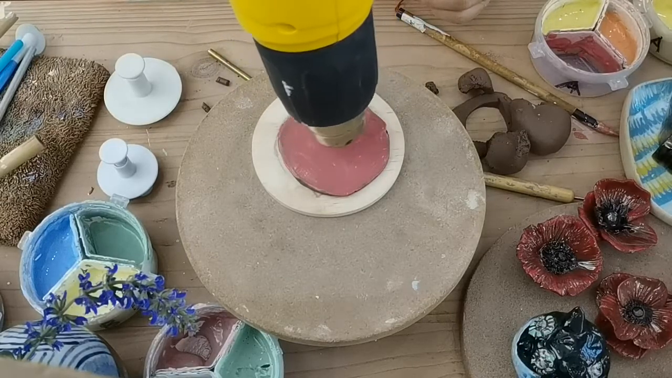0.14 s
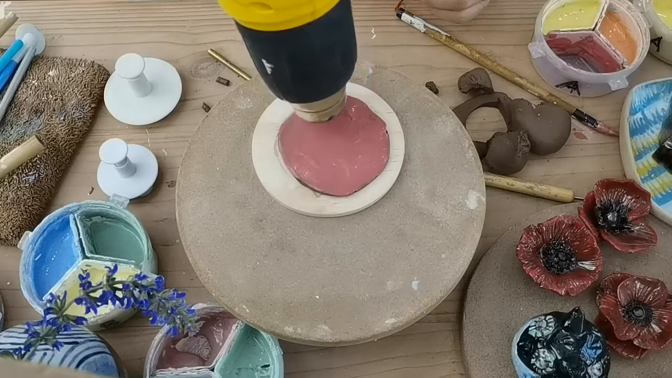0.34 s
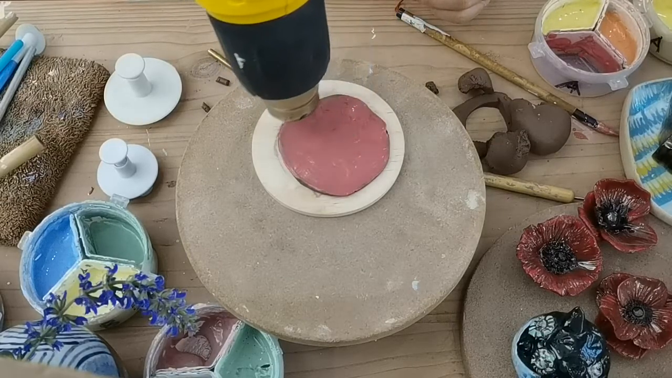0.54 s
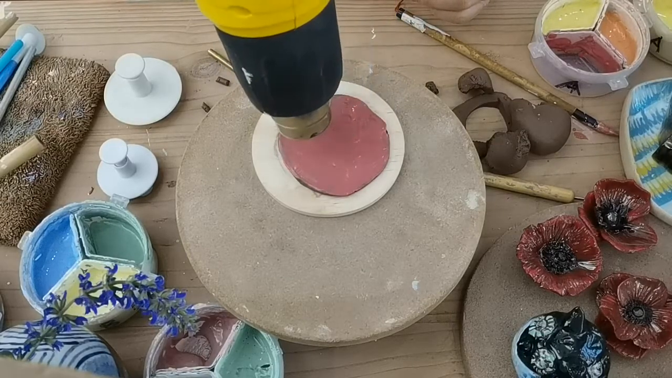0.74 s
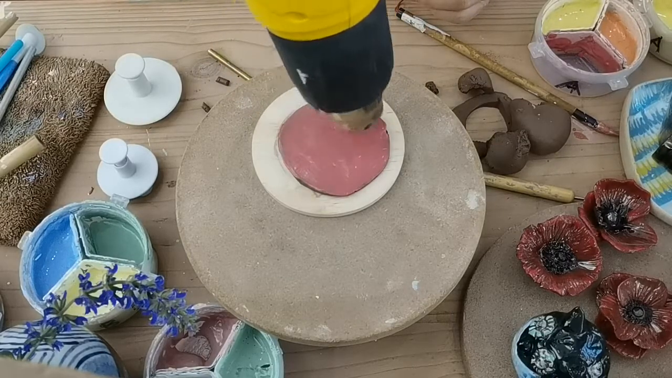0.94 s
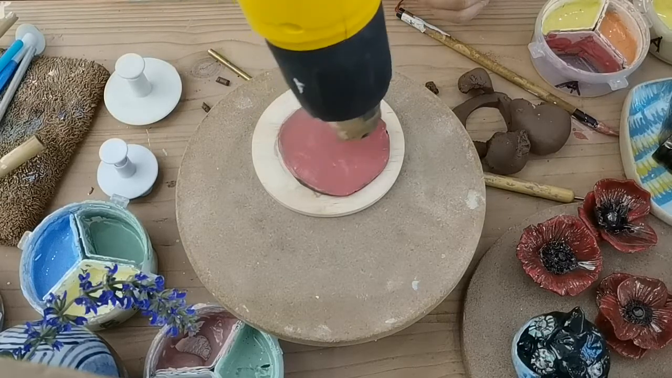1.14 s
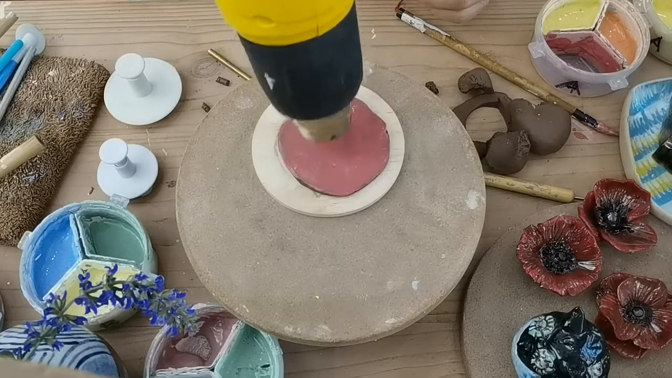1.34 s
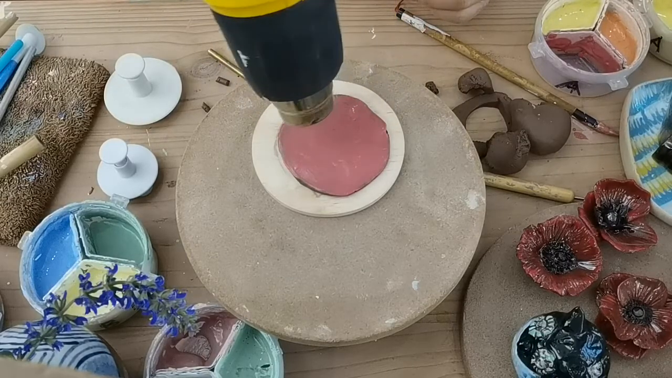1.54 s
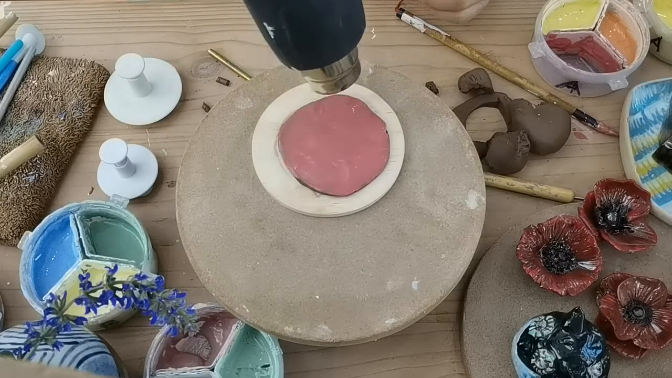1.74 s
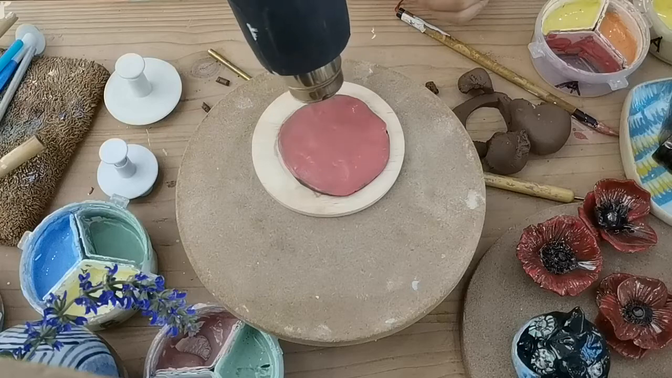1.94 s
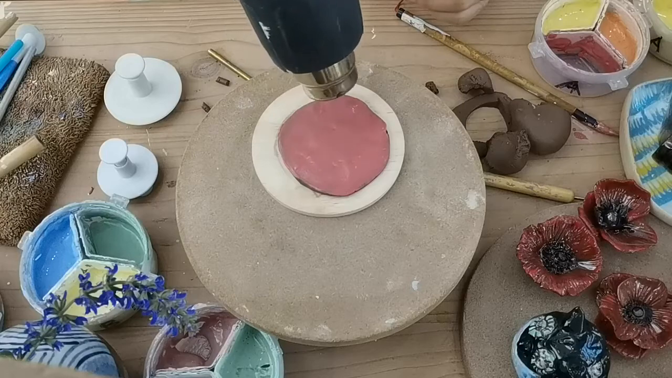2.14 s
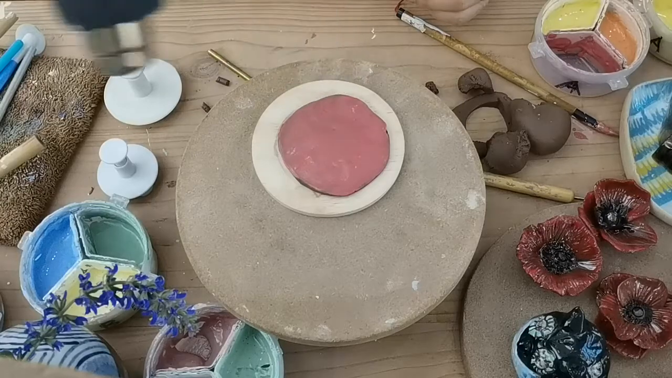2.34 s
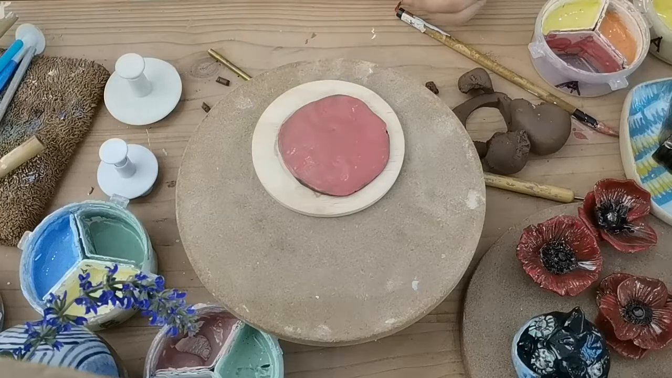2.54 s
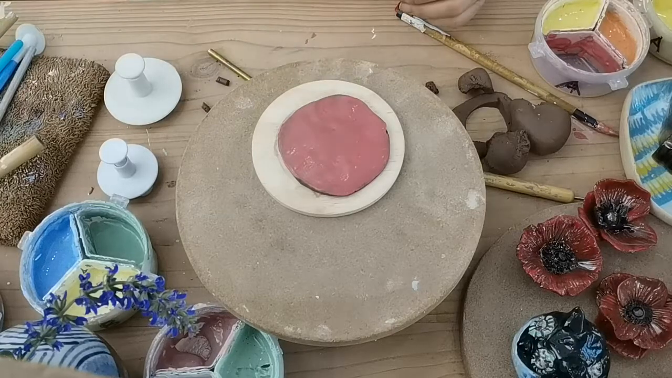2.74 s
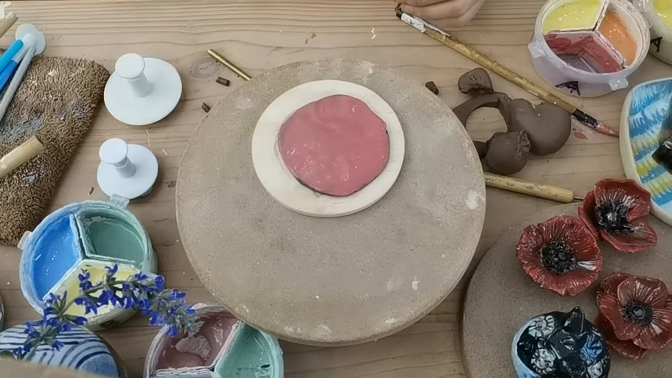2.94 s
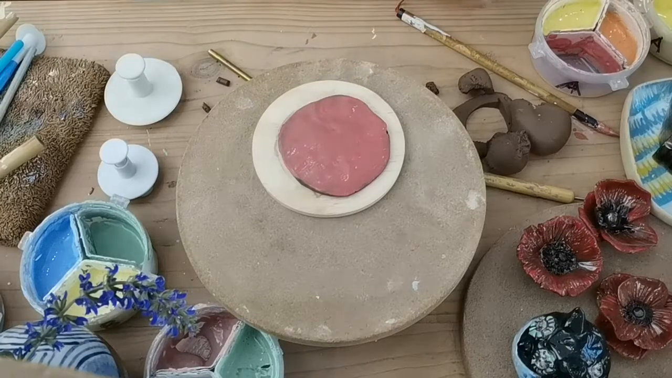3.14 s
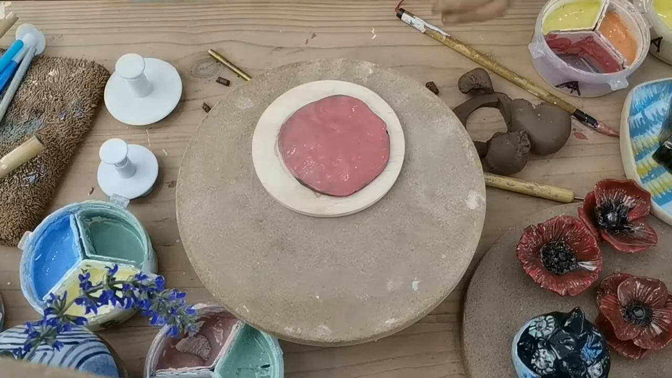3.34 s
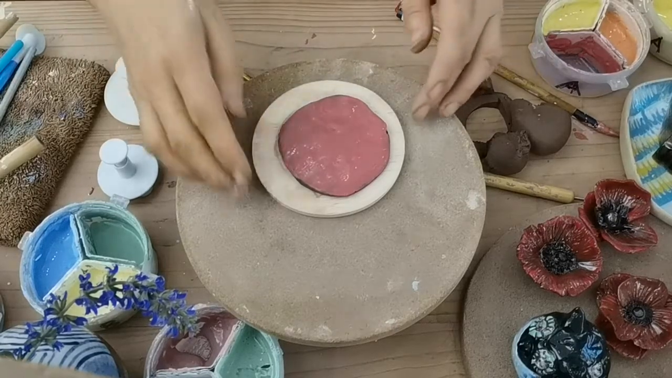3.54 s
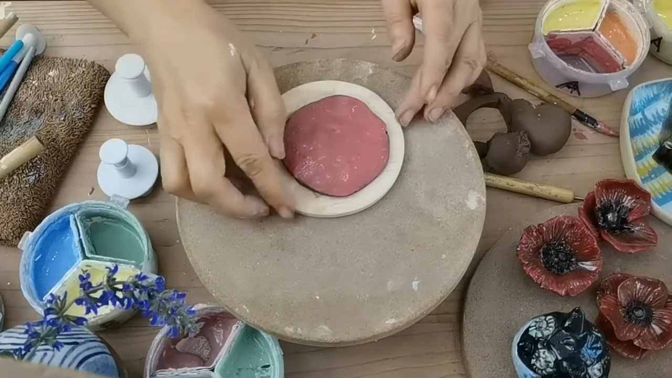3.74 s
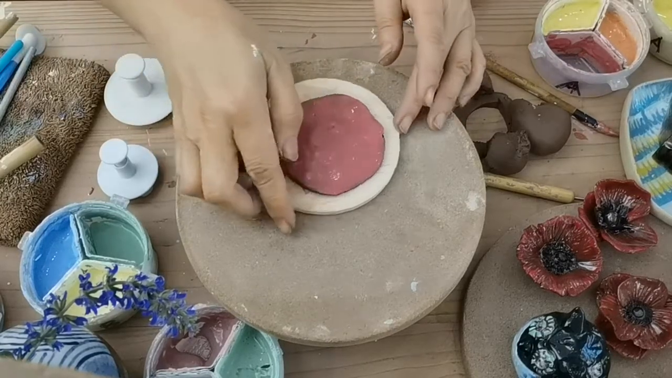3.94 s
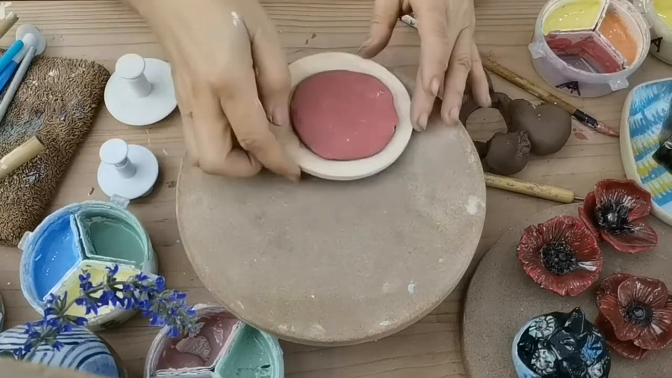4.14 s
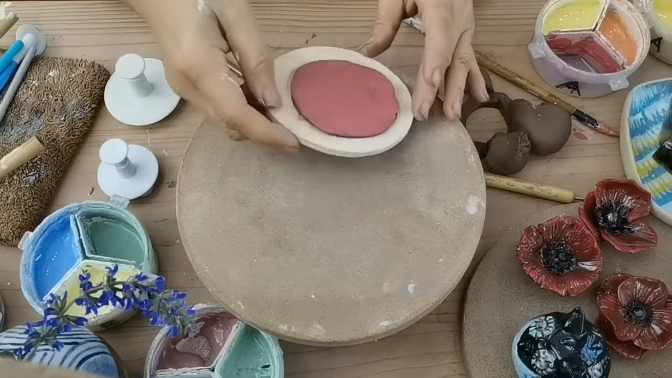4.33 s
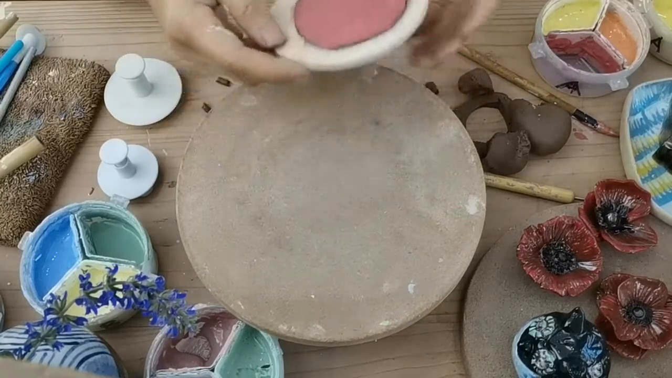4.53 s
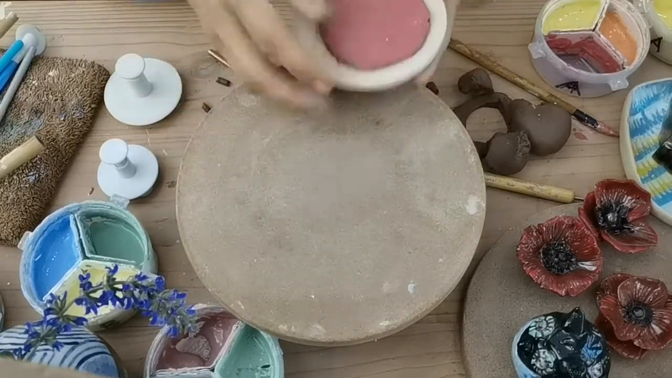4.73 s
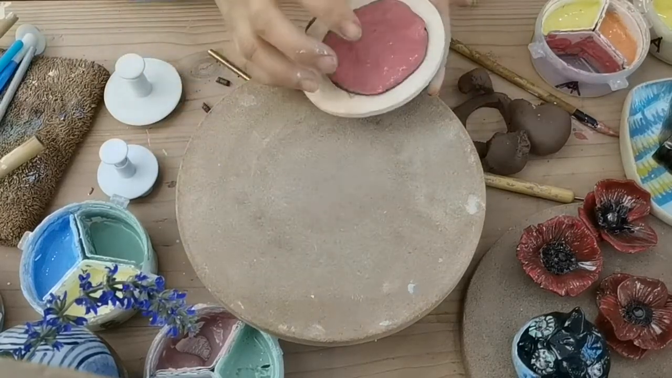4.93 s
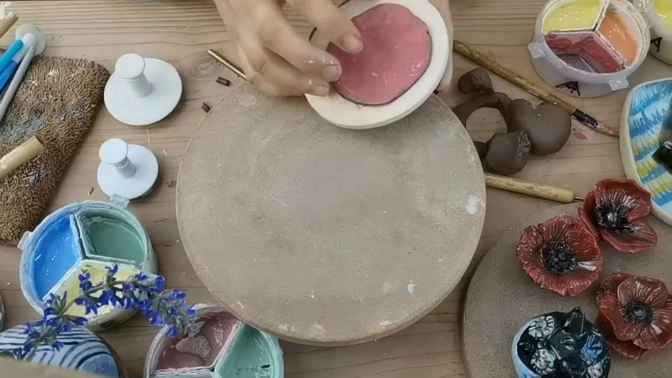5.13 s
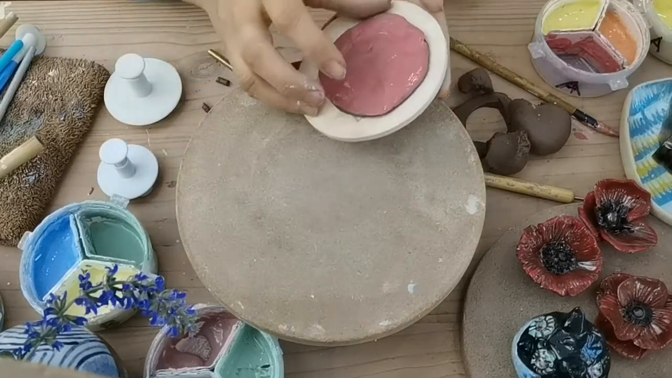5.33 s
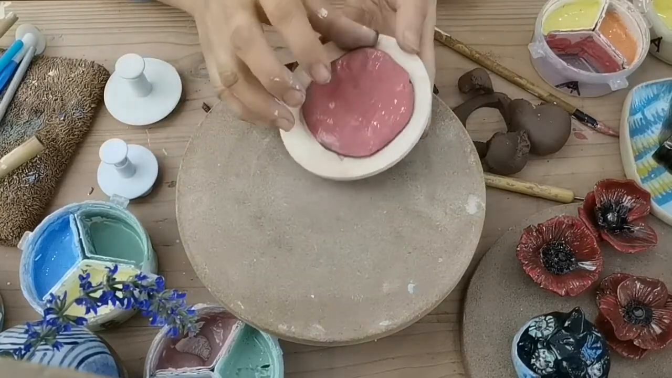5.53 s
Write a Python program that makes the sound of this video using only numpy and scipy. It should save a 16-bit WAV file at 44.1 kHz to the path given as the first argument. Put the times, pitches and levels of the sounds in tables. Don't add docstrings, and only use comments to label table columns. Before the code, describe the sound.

From 0 to 2.1 s a heat gun blows close by: a dense, steady roar of air, wide bright fan rush, brushy motor hiss and thin high whine, wavering slightly as the hand moves. At 2.09 and 2.15 s a sharp plastic double click switches it off; the whine vanishes and the rush darkens and sinks in a short falling moan, nearly gone by 3 s. At 3.03 s the tool lands on the wooden table with a knock, a heavier thud at 3.06 and small rattling taps until 3.2. Then a quiet room with low hum. From 3.65 to 4.3 s hands softly rub and drag a clay disc, with faint ticks; a clearer tick comes at 4.38, small finger squeaks around 4.8, and faint rubs at 5.2. A very faint glassy high ring flickers between 4.2 and 5.2. Very low stand rumble runs throughout; short room echo, close stereo microphone.

```python
import sys
import numpy as np
from scipy import signal
from scipy.fft import rfft, irfft, next_fast_len
from scipy.io import wavfile
from scipy.ndimage import uniform_filter1d

SR = 44100
rng = np.random.default_rng(int(sys.argv[2]) if len(sys.argv) > 2 else 0)


def gain_from_db(level_db):
    decades = np.asarray(level_db, float) / 20
    return 10 ** decades


def inscribe(sig):
    pcm = np.round(np.clip(np.atleast_2d(sig).T, -1, 1) * 32767)
    wavfile.write(sys.argv[1], SR, pcm.astype(np.int16))


N = 246078

# pitch_hz, level_db (per Hz)
AIR_RUNNING = [(41, -48.5), (70, -14), (213, -11.5), (268, -5), (329, -19), (410, -16), (655, -8),
               (747, -13), (827, -5.5), (943, -10.5), (1140, 1), (1510, -5.5), (1820, 3), (2080, -9.5),
               (2300, -10), (2990, -41), (5060, -120)]
AIR_SLOWING = [(41, -36.5), (70, 0.5), (105, -2), (129, -8.5), (198, -9.5), (435, -13), (664, -5),
               (780, -10), (943, -11), (2300, -21.5), (2990, -50), (5060, -120)]
# pitch_hz, level_db (per Hz)
RUSH_RUNNING = [(1350, -33), (2300, -4), (2710, 2), (3150, -9), (3370, -0.5), (3740, -8.5), (4050, -1),
                (4890, -6), (5210, -8), (6000, -9), (7800, -39), (13200, -120)]
RUSH_SLOWING = [(1350, -32), (2300, -5), (3000, -5), (3480, -4.5), (3870, -7), (4130, -1), (4600, -18),
                (6000, -22), (7800, -46.5), (13200, -120)]
# pitch_hz, level_db (per Hz)
HISS_RUNNING = [(3530, -41.5), (6000, -9), (7050, -8), (7550, -3.5), (8180, -7.5), (8640, -1), (9360, -11),
                (9690, -5.5), (10100, 1), (11800, -5.5), (12200, -7), (13900, -13), (14800, -20.5),
                (15300, -34)]
HISS_SLOWING = [(3530, -50), (6000, -23), (6450, -22), (6900, -3), (7490, -2), (8110, -8), (9970, -3),
                (11800, -14), (13100, -6), (15500, -19.5)]
# running_db, share_of_nearness, loss_when_stopped_db, fading_time_s
GUN_LAYERS = [
    (-31, 0.39, 35.5, 0.39),
    (-38.5, 2.2, 69.5, 1),
    (-37, 1.2, 35.5, 0.435),
]
# pitch_hz, level_db
WHINE = [(3628, -56), (3908, -55), (4188, -54), (4748, -57), (6702, -58), (7817, -50), (8096, -60),
         (8376, -67.5), (8936, -52), (9771, -50.5), (10051, -48), (10331, -56.5), (11445, -53),
         (11725, -54.5), (12010, -60.5), (12285, -61), (12565, -65), (13119, -66.5), (13399, -58),
         (13679, -59.5), (13959, -60), (14239, -64.5), (14513, -65.5), (14793, -62.5), (15068, -64.5),
         (15359, -73.5), (15635, -70), (10610, -59.5), (10889, -61.5), (11168, -59.5), (12843, -62.5)]
# top_s, rise_s, fall_s, level_db, pitch_hz
MOAN = [(2.32, 0.27, .22, -37, 1170), (2.38, .2, .1, -42.5, 1050), (2.25, 0.16, .15, -40.5, 1730),
        (2.56, .4, 0.45, -51.5, 935), (2.5, 0.11, 0.475, -55.5, 650), (2.66, 0.15, 0.18, -54, 375),
        (2.8, 0.74, .9, -75, 4200), (2.5, .4, 0.906, -64, 9850), (2.45, .3, .4, -57, 2700),
        (2.6, .4, 0.34, -65, 3500), (2.62, .4, .5, -69, 12700), (2.6, .4, .5, -70, 13500)]
# time_s, nearness_db, left_right_db
HAND = [
    (0.0, 0, -0.5),
    (0.67, 1, 0.2),
    (1.18, -.5, -0.3),
    (1.58, 1, 0.34),
    (1.68, -0.5, -0.5),
    (1.78, .5, -0.1),
    (2.1, 0, -0.51),
    (2.35, 0, -0.4),
    (2.75, 1.5, 3),
]
SHAFT_HZ = 279.2
OFF_S, COAST_S = 2.168, 0.39
LAID_S, MUFFLED_DB = 3.02, 11
SINK_HZ_PER_S = -150

# pitch_hz, likeness (1 = the same)
SAME = [(60, 0.9), (130, 1), (290, 0.78), (640, 0.83), (1410, 0.92), (3100, 0.127), (5500, -0.061),
        (9000, .24), (12000, -0.17), (15000, -.05)]
# pitch_hz, left_right_db
TILT = [(60, 0), (130, -1), (290, 0.0), (640, -1), (1410, -1.5), (3100, -2), (6820, 1.6), (15000, 2)]

# pitch_hz, level_db (per Hz)
ROOM = [(26, -22), (45, -5.5), (54, -5), (70, -21), (99, -10.5), (132, -16), (319, -26), (388, -22),
        (560, -29.5), (809, -28), (1530, -35), (2260, -44.5), (4170, -51.5), (8290, -55), (10100, -52.5),
        (13000, -54), (15700, -51)]
ROOM_DB = -53
# pitch_hz, likeness
ROOM_SAME = [(60, 0.827), (180, 0.93), (550, 0.23), (1650, -0.39), (4970, -0.19), (15000, -0.48)]
# pitch_hz, time_to_fall_60_db_s
TAIL = [(100, 0.32), (1000, 0.32), (4000, 0.31), (12000, 0.29)]
# top_s, rise_s, fall_s, level_db, pitch_hz
SWAY = [(.19, 0.18, .11, -39.5, 32.7), (.39, 0.086, 0.2, -45, 33), (.83, 0.27, 0.146, -34, 32),
        (1.15, 0.76, 1.05, -45.5, 29.9), (1.79, 2.28, 0.87, -34, 30.1), (2.3, 0.24, 0.24, -44.5, 30),
        (2.749, 0.18, 0.11, -56, 33), (3.16, 0.21, .11, -43, 32.5), (3.46, 0.45, 2.2, -50, 28.5),
        (4.35, 0.294, 0.36, -36.5, 30.1), (4.59, 0.212, 0.11, -39, 32.3), (5.14, 0.142, 0.25, -43.5, 33.2),
        (5.55, .22, 0.36, -48.5, 32.3), (.98, .9, 0.59, -55, 36), (1.7, .9, 0.93, -52.5, 37.1),
        (2.42, 1.26, 1.2, -36.5, 39.5), (3.81, 0.504, 0.23, -47.5, 39.4), (4.63, 0.41, 0.166, -57, 36.4),
        (5.24, .8, 0.37, -58.5, 37.2)]

# start_s, peak_db, ring_hz, knock_relative_db
SNAPS = [(2.085, -21, 11500, -2), (2.0854, -15, 7500, -8), (2.0865, -9, 7830, -10), (2.087, -19, 5200, -4),
         (2.0876, -12, 8200, -3), (2.0882, -19, 3600, -2), (2.0925, -21, 10500, -10),
         (2.096, -22, 11500, -10), (2.149, -17, 8000, -12), (2.15, -18, 10800, -11.5),
         (2.1514, -7, 5800, -6.5), (2.152, -11, 4400, -5), (2.1545, -19, 5600, -8),
         (2.1525, -14.5, 10300, -8), (2.159, -20, 10440, -14), (2.1605, -23, 13000, -14)]
# pitch_hz, level_db, time_to_fall_60_db_s
SWITCH = [(590, -5, 0.043), (1080, -7.5, 0.015), (1900, -2.5, 0.012), (3207.6, -9.5, 0.011),
          (4400, -3.5, .015), (10800, -7, 0.0031), (11820, -7, 0.0071)]

# start_s, table_bass_db, board_db, housing_db
LANDING = [
    (3.0298, -33, -19.5, -19),
    (3.039, -49.5, -33, -26),
    (3.055, -18.5, -17.5, -31),
    (3.058, -42, -29, -31),
    (3.068, -40.5, -28, -46),
    (3.091, -52.5, -44, -39.5),
    (3.111, -48, -48.5, -39),
    (3.117, -29, -32.5, -50),
    (3.127, -48.5, -46.5, -41),
    (3.183, -45.5, -38, -50.5),
]
# pitch_hz, level_db, time_to_fall_60_db_s
TABLE = [(98.7, -10.5, 0.3), (111, -1, 0.275), (133, -12, 0.094), (153.5, -12, 0.085), (205.8, -16.5, 0.25),
         (235, -7, 0.085)]
BOARD = [(289.8, -4.5, 0.075), (315, -16, 0.13), (381, -0.5, 0.087), (421, -7.5, 0.21), (470, -15, 0.081),
         (497, -17, 0.2), (573.4, -16, 0.13), (672, -23, 0.066), (887, -15, 0.037)]
HOUSING = [(1175, -8, 0.0585), (1232, -0.5, 0.057), (1100, -18, 0.05), (1434, -2.5, 0.037),
           (1688, -8, 0.05), (1900, -8, 0.033), (2345, -11, 0.037), (2600, -12, 0.036)]
# start_s, level_db, pitch_hz
CRACKS = [(3.0294, -26, 2700), (3.0297, -32, 5000), (3.0298, -45, 9500), (3.0299, -55, 14000),
          (3.032, -36, 4500), (3.039, -47, 2500), (3.0552, -17, 4200), (3.0553, -27.5, 8200),
          (3.0555, -40, 12300), (3.0565, -34.5, 10300), (3.0607, -28, 7200), (3.0612, -40, 10500),
          (3.0635, -30, 4000), (3.176, -46, 6830), (3.177, -58.5, 9100), (3.178, -46, 3600)]
HIT_LAG = 9

# top_s, rise_s, fall_s, level_db, hold_s
RUBS = [
    (3.948, .12, .15, -70.5, 0.046),
    (4.175, .06, 0.098, -57.5, 0.0069),
    (3.694, .044, .09, -63, 0),
    (4.06, .07, .06, -57, 0.091),
    (4.27, .1, 0.048, -62, 0),
    (4.386, .001, 0.0547, -53.5, 0.0054),
    (4.79, .035, 0.087, -54.5, 0.00012),
    (5.101, .045, .1, -74.5, 0.062),
    (5.219, .058, 0.099, -67, 0.003),
    (5.311, 0.046, .12, -78, 0.126),
]
# pitch_hz, level_db (per Hz)
RUB_COLOURS = [
    [(2500, -25), (4300, -2.5), (5500, -15), (7000, -4.5), (8500, -5.5), (10200, 1), (14000, -8.5)],
    [(1500, -13), (2200, -2), (3500, 0.5), (5000, -4), (6000, -9.5), (7600, -3), (10500, -5.5),
     (14000, -16.5)],
    [(2350, -49.5), (4000, -15), (5360, -27.5), (6160, 1), (7470, -19.5), (11600, -8), (15000, -9.5)],
    [(1470, -31.5), (2500, -3), (3400, -14), (4100, 1), (5300, -5), (6300, -11.5), (7500, -7),
     (8230, -13.5), (9860, -4.5), (12000, -21), (15000, -22)],
    [(2350, -44.5), (4000, -11.5), (5100, -13.5), (8720, -2), (11600, -14), (15000, -11)],
    [(1470, -31), (2500, -6.5), (2800, -8), (3270, -2.5), (5530, -9), (9860, 1.5), (15000, -13.5)],
    [(1470, -30), (2500, -7.5), (3370, -26), (4100, -4), (4490, -16.5), (4950, -7.5), (10800, -0.5),
     (15000, -9.5)],
    [(2940, -40), (5000, -16), (6880, -10), (7890, 0.5), (13000, -18.5)],
    [(1760, -39.5), (3000, -10), (4180, -1.5), (6380, -25), (7670, -6.5), (13000, -17.5)],
    [(2940, -40.5), (5000, -13.5), (8270, -8), (10100, 0), (13000, -23)],
]
# top_s, rise_s (negative, so it
# only falls), fall_s, level_db, hold_s
WISP = (2, -0.2, 1.13, -70.5, 0.3)
# top_s, rise_s, fall_s, level_db, pitch_hz
SCUFF = [
    (3.664, 0.028, 0.075, -53.5, 269),
    (4.04, .15, 0.3, -53.5, 268),
    (4.19, .12, 0.046, -61, 244),
]
# top_s, rise_s, fall_s, level_db, pitch_hz
DRAG = [
    (3.988, 0.15, 0.026, -69, 1304),
    (4.05, 0.063, 0.27, -60.5, 1390),
    (4.178, .09, 0.122, -60, 1455),
]
# top_s, rise_s, fall_s, level_db, pitch_hz
SQUEAKS = [
    (4.783, 0.0247, 0.033, -59, 2048),
    (4.808, 0.0313, 0.02, -57.5, 1900),
    (4.828, 0.011, 0.028, -66, 2097),
    (5.215, 0.07, 0.11, -66.5, 1963),
    (5.542, .045, 0.0337, -71, 2038),
]
# top_s, rise_s, fall_s, level_db,
# pitch_hz
WHISTLES = [(4.64, .25, .2, -83, 2750), (4.63, .15, .3, -83, 2320), (4.85, .12, .12, -81, 2320),
            (3.4, .5, 1.2, -85, 4250), (3.4, .4, .9, -87, 7000), (5.4, .06, 0.053, -82, 2300),
            (4.27, .04, 0.054, -76.5, 10900)]
# start_s, peak_db, pitch_hz, left_right_db
TICKS = [
    (4.0298, -64.5, 3000, -0.7),
    (4.042, -55.5, 1400, -1.04),
    (4.186, -57, 1500, 0.3),
    (4.1798, -52, 3440, 2.5),
    (4.35, -65, 1210, -2.0),
    (4.3803, -32, 2060, 4.5),
]
# pitch_ratio, level_db, time_to_fall_60_db_s
DISC = [(.9, -17.5, .007), (1, 11.5, 0.011), (1.12, -5, .007), (1.7, 0.5, 0.0041), (2.2, -13.5, 0.0035),
        (3.1, -2.5, 0.0075), (4.6, -12, 0.0047)]
# top_s, rise_s, fall_s, level_db, hold_s
RING = [
    (4.258, .08, 0.088, -75, 0),
    (4.601, 0.06, 0.27, -74.5, 0.06),
    (4.757, 0.11, 0.1, -78.5, 0.19),
    (5.045, .04, .05, -86, 0.015),
    (5.13, .05, .1, -87, .05),
]
# top_s, rise_s, fall_s, level_db, hold_s
UNDERTONE = [(4.68, .03, .04, -87, .015), (4.735, .03, .04, -85, .025), (4.81, .03, .05, -86, .03),
             (4.88, .03, .04, -88, .015), (5.02, .03, .03, -91, .01)]
RING_HZ = 8706
DEPTH_DB = 29.5

# pitch_hz, level_db
MIC = [(13500, 0), (14800, 0), (15700, -4), (16100, -30.5)]


def evened(x):
    return x / np.sqrt(np.mean(x ** 2) + 1e-20)


def read(points, hz):
    f, value = np.transpose(points)
    return np.interp(np.log(hz + 1), np.log(f + 1), value)


def coloured(x, points):
    n = next_fast_len(x.shape[-1])
    gain = gain_from_db(read(points, np.fft.rfftfreq(n, 1 / SR)))
    return irfft(rfft(x, n) * gain, n)[..., :x.shape[-1]]


def add(mix, s, sound):
    part = mix[..., round(s * SR):][..., :sound.shape[-1]]
    part += sound[..., :part.shape[-1]]


def panned(x, db):
    return np.array([x * gain_from_db(db / 2), x * gain_from_db(-db / 2)])


def resonate(x, hz, width_hz):
    turn = np.exp(2j * np.pi * np.cumsum(hz * np.ones(len(x))) / SR)
    r = np.exp(-np.pi * width_hz / SR)
    smooth = signal.lfilter([1 - r], [1, -r], x / turn + 1e-18)
    return 2 * (turn * smooth).real


def resonate_twice(x, hz, width_hz, hz2, width2_hz):
    return resonate(resonate(x, hz, width_hz), hz2, width2_hz)


def modes(table, factor=1):
    t = np.arange(SR // 4) / SR
    return sum(gain_from_db(db - 60 * t / t60) * np.sin(2 * np.pi * hz * factor * t) for hz, db, t60 in table)


def puff(t60, size):
    return rng.standard_normal(size) * gain_from_db(-60 * np.arange(size) / SR / t60)


def noise(start, end, blend, same, patchy_db):
    frames, hz = len(blend) // 256 + 5, np.fft.rfftfreq(1024, 1 / SR)
    a, b, c, d, patches = rng.standard_normal((frames, 513, 5)).T
    patches = uniform_filter1d(patches, size=6, axis=0)
    patches = evened(uniform_filter1d(patches, size=14, axis=1))
    share = blend[np.minimum(np.arange(frames) * 256, len(blend) - 1)]
    shape = gain_from_db(read(start, hz)[:, None] * (1 - share) + read(end, hz)[:, None] * share)
    shape /= np.sqrt((shape ** 2).mean(0))
    like = np.clip(read(same, hz), -1, 1)[:, None]
    left = a + 1j * b
    right = like * left + np.sqrt(1 - like ** 2) * (c + 1j * d)
    z = np.array([left, right])
    z *= shape * gain_from_db(patchy_db * patches) * panned(np.ones((513, 1)), read(TILT, hz)[:, None])
    return evened(signal.istft(z, nperseg=1024, noverlap=768)[1][:, :len(blend)])


def swell(top, rise, fall, db, hold=0):
    t = np.arange(max(top - rise, 0), top + hold + fall, 1 / SR)
    below = np.maximum(np.maximum((top - t) / rise, (t - top - hold) / fall), 0)
    return t, gain_from_db(db - DEPTH_DB * below)


def ringing(hz, *shape):
    t, gain = swell(*shape)
    return t[0], np.sqrt(2) * gain * np.sin(2 * np.pi * hz * t)


def grit(size, same):
    a, b = rng.standard_normal((size, 2)).T
    lumps = gain_from_db(1.3 * evened(uniform_filter1d(rng.standard_normal(size), size=150)))
    like = np.clip(same, 0, 1)
    return lumps * np.array([a, like * a + np.sqrt(1 - like ** 2) * b])


def scrape(row, width_hz, same, glide=0):
    t, gain = swell(*row[:-1])
    hz = row[-1] + glide * (t - row[0])
    sound = np.array([resonate_twice(g, hz, width_hz, hz, width_hz) for g in grit(len(t), same)])
    return t[0], gain * evened(sound)


def whine(turns):
    out = np.zeros((2, len(turns)))
    for hz, db in WHINE:
        waver = rng.standard_normal((len(turns) // 256 + 1, 2))
        waver = evened(uniform_filter1d(waver, size=20, axis=0))
        level = np.repeat(gain_from_db(db + 2.5 * (waver - waver.mean(0))), 256, 0)[:len(turns)].T
        multiple = round(hz / SHAFT_HZ)
        out += level * np.cos(2 * np.pi * (multiple * turns + rng.random((2, 1))))
    return np.sqrt(2) * out


def heat_gun():
    t = np.arange(0, 3.8, 1 / SR)
    s, *columns = np.transpose(HAND)
    near_db, pan_db = (np.interp(t, s, c) for c in columns)
    off = np.maximum(t - OFF_S, 0)
    air_db, rush_db, hiss_db = (db + share * near_db - loss_db * (1 - np.exp(-(off / tau) ** 1.113))
                                for db, share, loss_db, tau in GUN_LAYERS)
    speed = np.exp(-off / COAST_S)
    slowed = np.clip(1.1 * (1 - speed), 0, 1)
    drift = evened(uniform_filter1d(rng.standard_normal(len(t)), size=SR // 4))
    turns = np.cumsum(SHAFT_HZ * speed ** .4 * (1 + .0003 * (drift - drift.mean()))) / SR

    out = gain_from_db(air_db) * noise(AIR_RUNNING, AIR_SLOWING, slowed, SAME, patchy_db=1.58)
    out[0] = np.roll(out[0], shift=2)
    out += gain_from_db(rush_db) * noise(RUSH_RUNNING, RUSH_SLOWING, slowed, SAME, patchy_db=2.0)
    throb = 1 + .18 * np.cos(2 * np.pi * turns)
    out += gain_from_db(hiss_db) * throb * noise(HISS_RUNNING, HISS_SLOWING, slowed, SAME, patchy_db=2.0)
    powered = slice(0, round(2.4 * SR))
    whine_gain = gain_from_db(0.83 * near_db + 2.05) * speed ** 7
    out[:, powered] += whine(turns[powered]) * whine_gain[powered]
    for row in MOAN:
        add(out, *scrape(row, width_hz=60 + .03 * row[-1], same=0.55, glide=SINK_HZ_PER_S))

    muffling = gain_from_db(-MUFFLED_DB * np.clip((t - LAID_S) / .15, 0, 1))
    fade = np.clip((t[-1] - t) / .4, 0, 1)
    return out * panned(muffling * fade, pan_db)


def room_tone():
    return gain_from_db(ROOM_DB) * noise(ROOM, ROOM, np.zeros(N), ROOM_SAME, patchy_db=.7)


def swaying_stand():
    out = np.zeros((2, N))
    for row in SWAY:
        s, sound = ringing(row[-1], *row[:-1])
        add(out, s, panned(sound, rng.uniform(-2.5, 2.5)))
    return out


def switch():
    out = np.zeros(N)
    for s, db, hz, knock_db in SNAPS:
        drive = np.diff(puff(0.012, size=1501))
        body = modes(SWITCH, rng.uniform(0.91, 1.03))[:3000]
        ring = resonate_twice(drive, hz, 1500, hz, 3000)
        add(out, s, gain_from_db(db) * (1.2 * ring + 0.14 * drive))
        add(out, s, gain_from_db(db + knock_db - 8.0) * body)
    return out


def echo(x):
    taps = np.zeros((2, SR // 2))
    at = np.arange(300, SR // 2 - 20, 20) + rng.integers(0, 20, (2, (SR // 2 - 301) // 20))
    np.put_along_axis(taps, at, rng.choice([-1., 1.], at.shape), 1)
    hz, t, z = signal.stft(taps, SR, nperseg=256)
    like = np.clip(read(SAME, hz), 0, 1)[:, None]
    z[1] = like * z[0] + np.sqrt(1 - like ** 2) * z[1]
    dying = gain_from_db(-60 * t / read(TAIL, hz)[:, None])
    tail = signal.istft(z * dying, SR, nperseg=256)[1]
    return signal.fftconvolve(x[None], tail / np.linalg.norm(tail[0]), axes=1)[:, :N]


def landing():
    out = np.zeros(N)
    soft_push = signal.windows.hann(50) / 25
    hard_push = signal.windows.hann(12) / 6
    for s, table_db, board_db, housing_db in LANDING:
        table = modes(TABLE, rng.uniform(1.0, 1.03))
        board = modes(BOARD, rng.uniform(0.96, 1.03))
        housing = modes(HOUSING, rng.uniform(0.98, 1.02))[:6000]
        add(out, s, -gain_from_db(table_db) * signal.oaconvolve(soft_push, table))
        add(out, s, gain_from_db(board_db) * signal.oaconvolve(soft_push, board))
        add(out, s, gain_from_db(housing_db - 1.5) * signal.oaconvolve(hard_push, housing))
        board_blur = resonate_twice(puff(.1, size=6000), 340, 260, 350, 400)
        housing_blur = resonate_twice(puff(.05, size=4000), 1300, 630, 1500, 1700)
        add(out, s, gain_from_db(board_db - 5) * board_blur * 4)
        add(out, s, gain_from_db(housing_db - 6) * housing_blur * 2)
    for s, db, hz in CRACKS:
        crack = resonate_twice(puff(0.015, size=4000), hz, 0.35 * hz, hz, 0.65 * hz)
        add(out, s, gain_from_db(db) * crack)
    return out


def stroke(row, colour):
    t, gain = swell(*row)
    return t[0], gain * evened(coloured(grit(len(t), same=0.208), colour))


def rubs_and_slides():
    out = np.zeros((2, N))
    add(out, *stroke(WISP, RUB_COLOURS[-1]))
    for row, colour in zip(RUBS, RUB_COLOURS):
        add(out, *stroke(row, colour))
    # rows, resonance width in Hz, left-right likeness
    for rows, width_hz, same in (SCUFF, 110, .92), (DRAG, 1300, .62), (SQUEAKS, 290, .52), (WHISTLES, 40, .6):
        for row in rows:
            add(out, *scrape(row, width_hz, same))
    return out


def disc_ticks():
    out = np.zeros((2, N))
    tap = signal.windows.hann(9) / 4
    for s, db, hz, pan_db in TICKS:
        body = np.diff(modes(DISC, hz)[:4000], prepend=0)
        tick = signal.oaconvolve(tap, body)
        tick = resonate_twice(tick, hz * 1.1, 2030, hz * 2.13, 4240)
        add(out, s, panned(gain_from_db(db + 3.5) * tick, pan_db))
    return out


def glassy_ring():
    out = np.zeros((2, N))
    for hz, rows in (RING_HZ, RING), (RING_HZ * 2 / 3, UNDERTONE):
        for row in rows:
            s, sound = ringing(hz, *row)
            flutter = evened(uniform_filter1d(rng.standard_normal(len(sound)), size=500))
            add(out, s, panned(gain_from_db(-1 + 3.36 * flutter) * sound, 12.5))
    return out


def scene():
    mix = room_tone() + swaying_stand()
    add(mix, 0, heat_gun())
    clicks, hits = switch(), landing()
    hands = rubs_and_slides() + disc_ticks() + glassy_ring()
    mix += panned(clicks, .6) + panned(hits, -.5) + hands
    mix[1] += coloured(np.roll(hits, HIT_LAG) - hits, [(500, 0), (1300, -30)])
    mix += echo(gain_from_db(-5.5) * clicks + gain_from_db(-4.5) * hits + gain_from_db(-14.0) * hands.mean(0))
    return mix


def roll_off(x):
    return signal.sosfilt(signal.butter(12, 15810, fs=SR, output="sos"), x)


def record(dry):
    mix = coloured(dry, MIC)
    return roll_off(mix)


dry = scene()
out = record(dry)
inscribe(out)
```